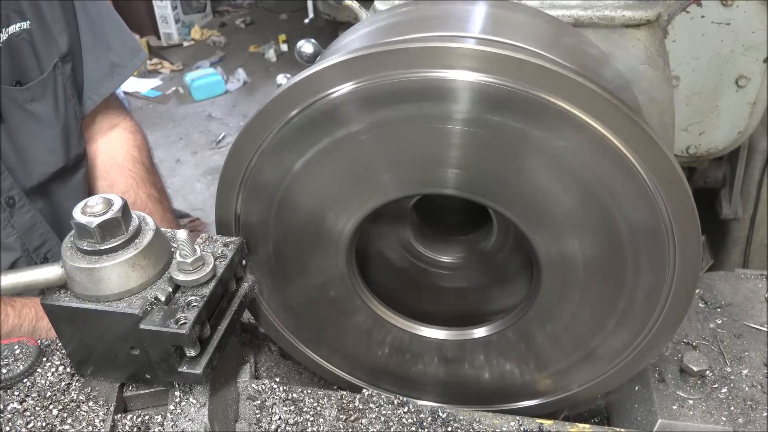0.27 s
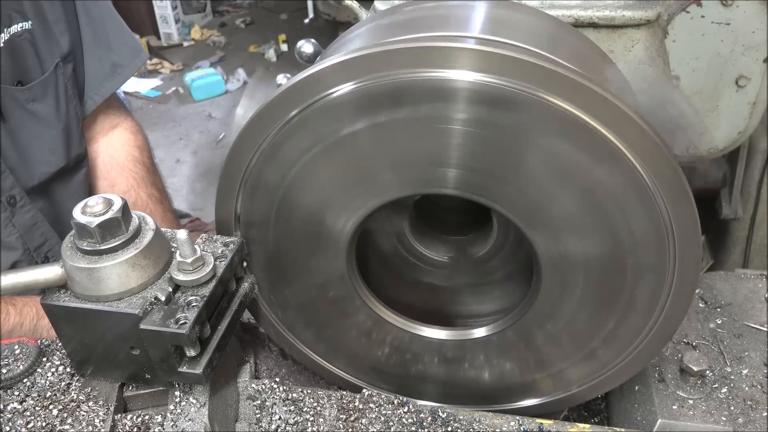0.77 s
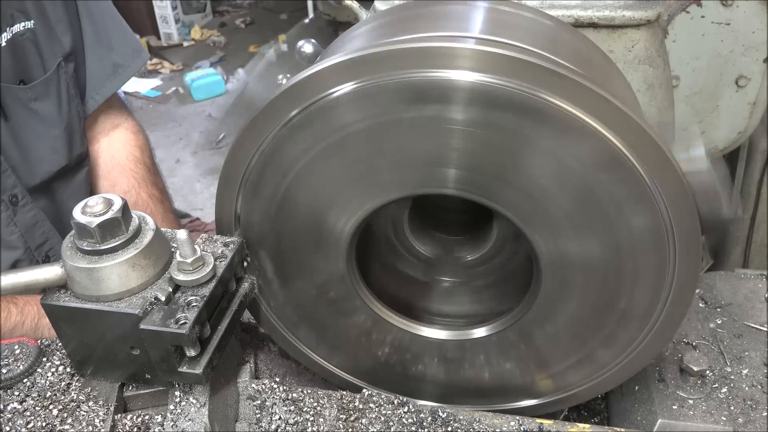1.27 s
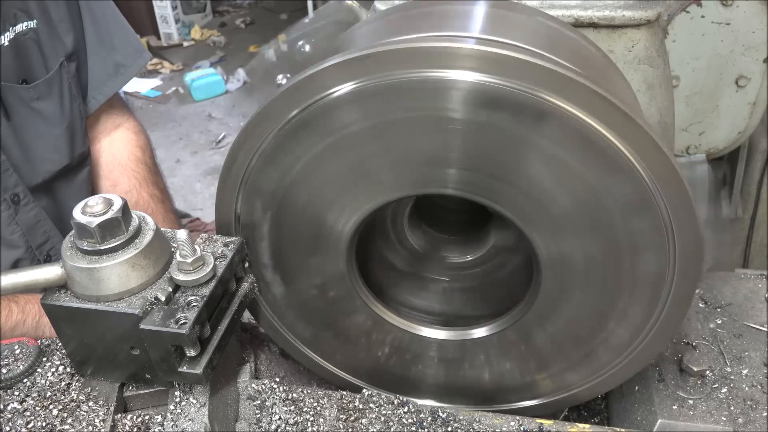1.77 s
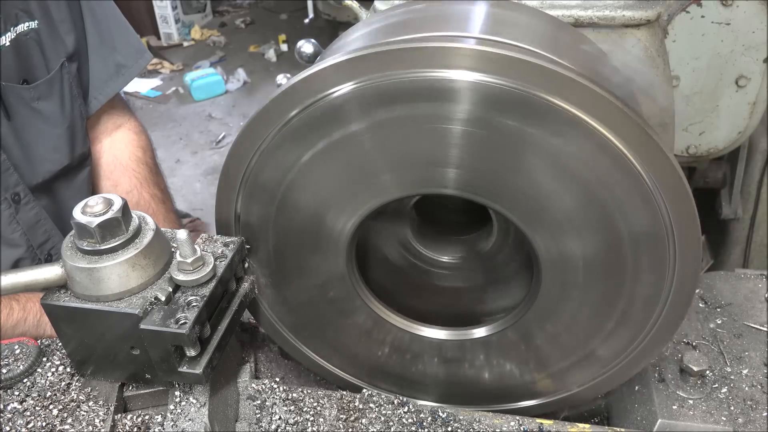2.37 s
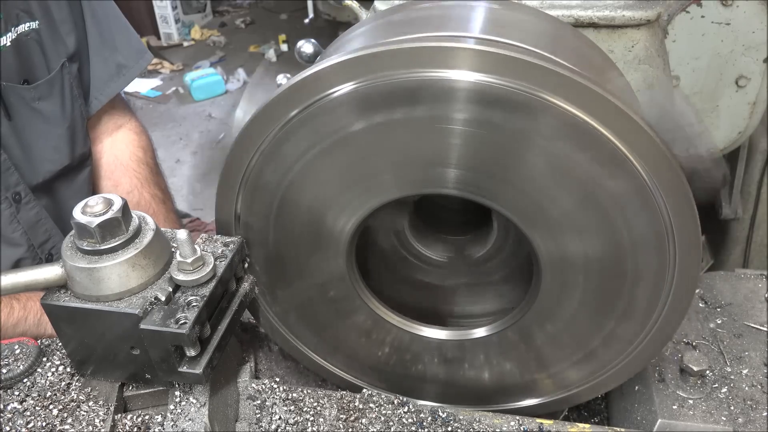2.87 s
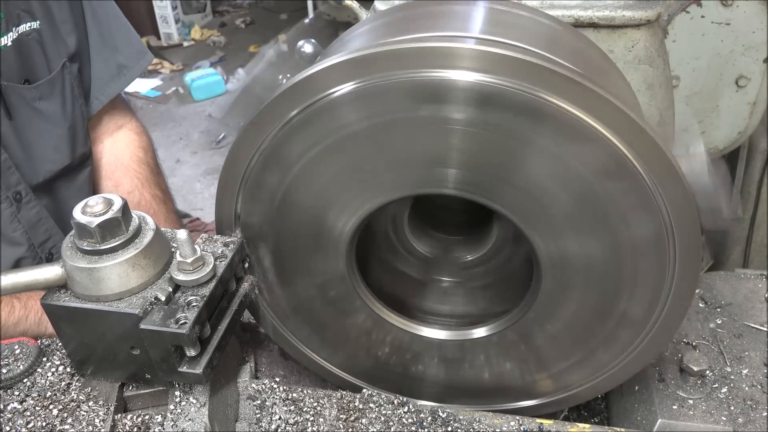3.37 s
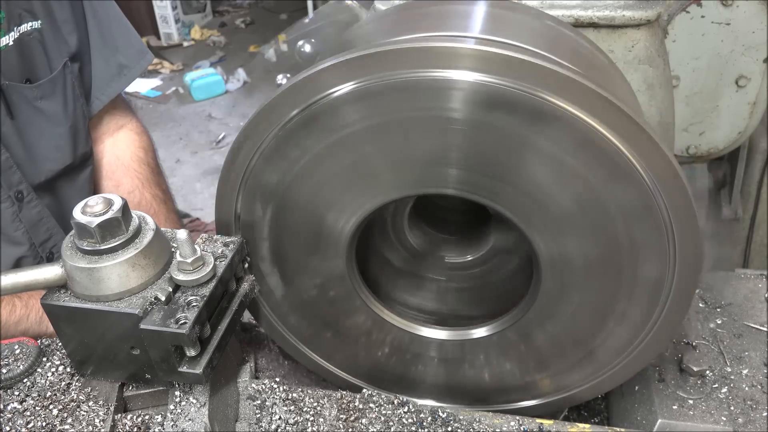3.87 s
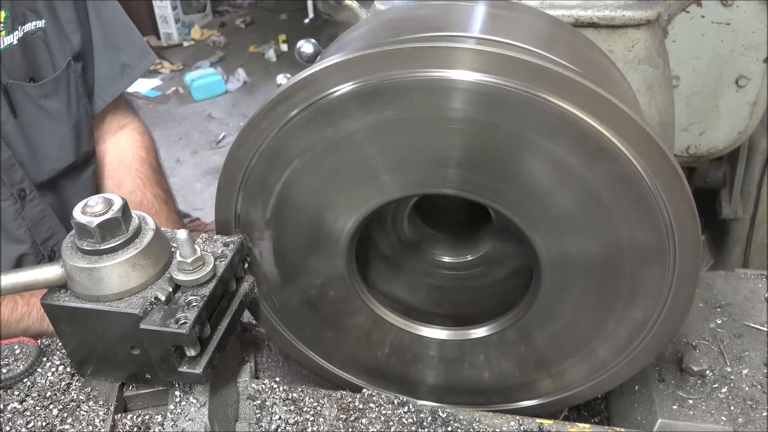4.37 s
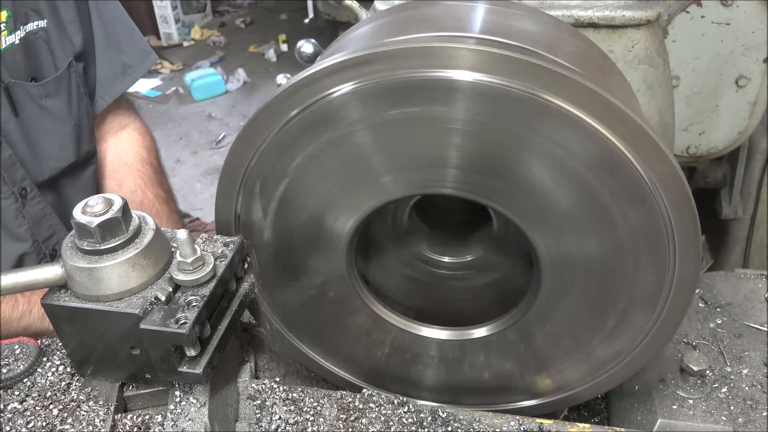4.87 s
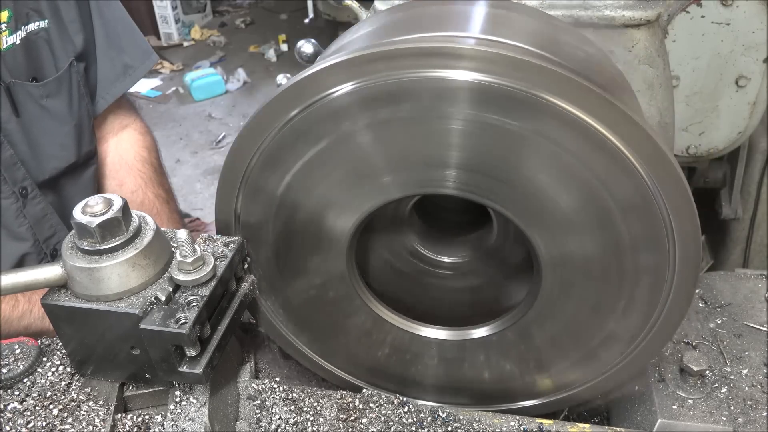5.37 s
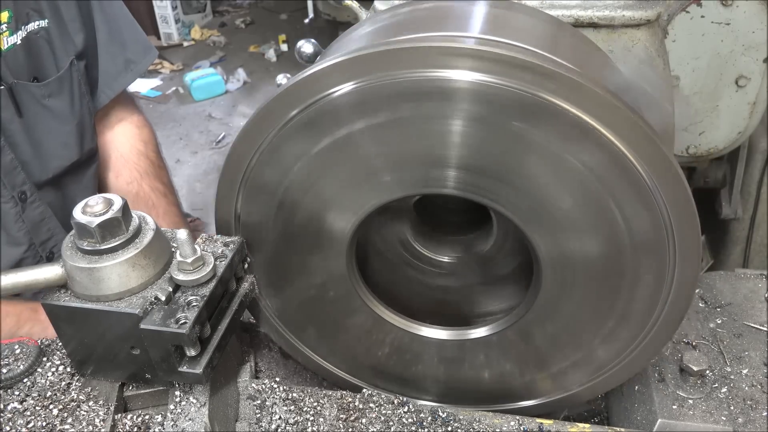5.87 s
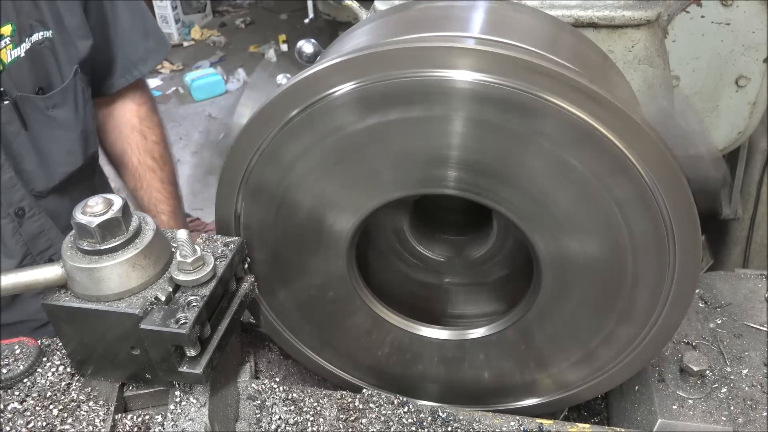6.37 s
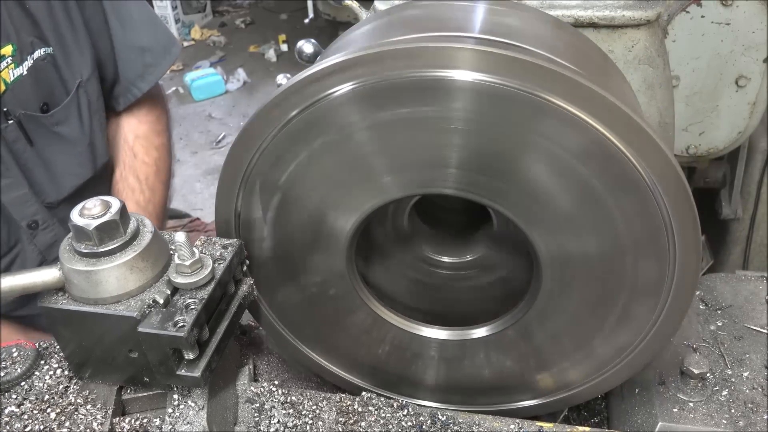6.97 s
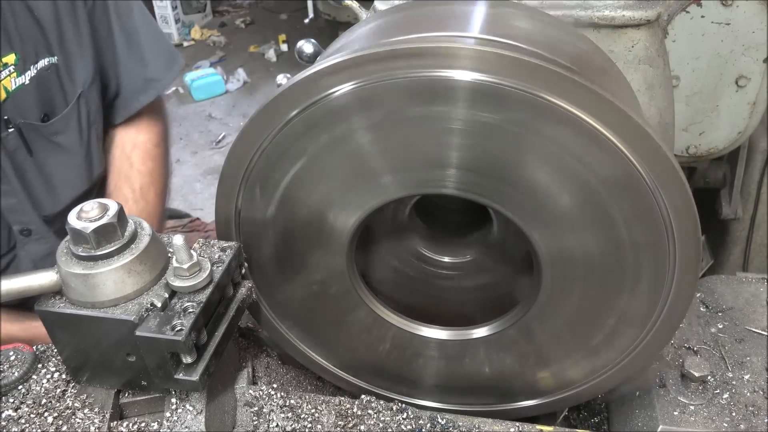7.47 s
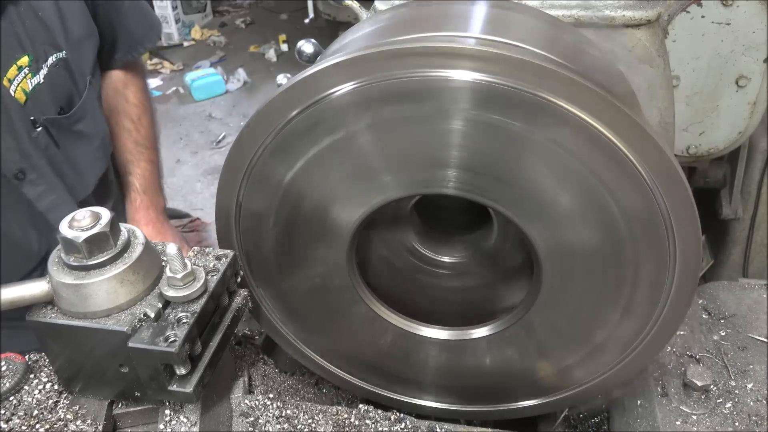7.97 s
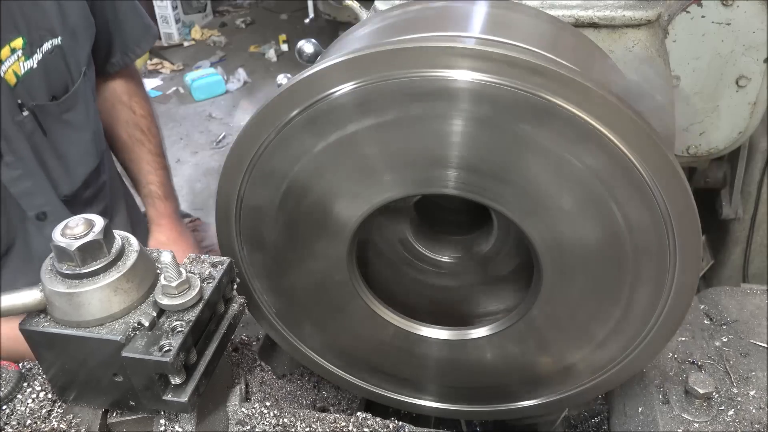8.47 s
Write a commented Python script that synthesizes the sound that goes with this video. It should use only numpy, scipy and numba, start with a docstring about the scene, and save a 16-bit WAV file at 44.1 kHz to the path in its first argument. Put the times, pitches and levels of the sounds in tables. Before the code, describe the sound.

Close up in a workshop, steel rings and screeches under a lathe cutter, swelling several times a second over the hiss of tearing chips. The tool then stutters off the metal in brief, pinging scrapes and gives one very high squeak with a sharp click. After a light tick, only the running machine remains, a steady low rumble with a hum and a gear whine.

```python
"""A bright, rough ring of steel, swelling three times a turn: a lathe tool cuts an out-of-round rim,
and the tearing chip scrapes and drives the modes of the part and the tool post. Near 6 s the tool
stutters out of the cut in short bites that leave the part pinging; its tip squeaks with a sharp click.
One light tick follows as motor and gears rumble and whine on, and the automatic gain creeps up."""
import sys
import numpy as np
from scipy import signal
from scipy.io import wavfile
from scipy.ndimage import uniform_filter1d
from numba import njit

SR = 44100
rng = np.random.default_rng(int(sys.argv[2]) if len(sys.argv) > 2 else 0)


def dump_mix(stems):
    """Bounce the given channels to the path in sys.argv[1] as a 16-bit WAV at rate SR."""
    frames = np.atleast_2d(stems).T  # one column per channel
    limited = np.clip(frames, -1, 1)  # hard clip at full scale
    pcm = np.round(limited * 32767).astype(np.int16)
    wavfile.write(sys.argv[1], SR, pcm)


N = 384552
STEP = 16  # samples between points of slow envelopes
SLOW_T = np.arange(0, N, STEP) / SR
LOBES_PER_S = 5.698  # the rim has three high places (lobes) a turn


def cut():
    """The chip sticks and slips as it tears; returns the ringing machine and the scraping chips."""
    region_db = chip_force()
    slips_db = 0.56 * wander(rate=75)
    steel = steel_ring(region_db, slips_db)
    tearing = scrape(region_db, slips_db)
    return steel + thrum(region_db), facets(tearing, depth_db=5.5)


# Loaded modes of part and tool post: (pitch [Hz], width [Hz], level [dB], then pairs of
# swell [dB] and crest [lobes] once a turn and 1, 2, 3, 4 times a lobe, then pairs of
# bend [Hz] and crest [lobes] 1, 2 times a lobe)
STEEL_MODES = [(637.5, 46, -54.5, 0.55, 1, 2.9, 0.11, 0.68, 0.1, 0.5, 0.2, 0.4, 0.1, 15.2, 0.3, 4.5, 0.17),
               (827, 67, -48, 0.5, 1, 2.2, 0.54, 1.5, 0.14, 1.1, 0.23, 0.4, 0.02, 11.5, 0.5, 10, 0.032),
               (924, 89, -49.5, 0.5, 1, 1.2, 0.49, 1.5, 0.3, 0.7, 0.035, 0.4, 0.02, 15, 0.608, 17, 0.2),
               (1068, 57, -51.5, 0.5, 0.8, 2.6, 0.63, 1, 0.069, 1, 0.056, 0.4, 0.02, 10, 0.62, 8.2, 0.22),
               (1153, 113, -44, 1.3, 1.04, 7.2, 0.17, 1.8, 0.023, 3.8, 0.23, 0.67, 0.08, 32.1, 0.15, 39.3, 0.311),
               (1376, 56, -43, 0.44, 0.27, 2.7, 0.35, 1, 0.41, 4.2, 0.11, 3.2, 0.093, 26.6, 0.529, 44.6, 0.345),
               (1519, 84, -48, 0.34, 1, 9.2, 0.1, 10.8, 0.34, 1.9, 0.1, 3.6, 0.22, 109.5, 0.149, 32.6, 0.382),
               (1893, 170, -43, 0.4, 0.02, 0.59, 1, 6.2, 0.38, 1.4, 0.081, 1.7, 0.072, 47, 0.91, 91.5, 0.044),
               (2106, 76, -43, 3.1, 0.98, 5, 0.94, 2.4, 0.13, 3.3, 0.27, 1.7, 0.17, 122, 0.168, 47, 0.187),
               (2248, 165, -41.5, 0.37, 1.1, 6.7, 0.26, 2.1, 0.42, 1.3, 0.18, 0.55, 0.062, 184.0, 0.1912, 89.5, 0.0626),
               (2405, 27, -44, 1.7, 0.94, 7.7, 0.89, 6.9, 0.097, 8.2, 0.186, 3.2, 0.24, 105.8, 0.1003, 40, 0.1985),
               (2506, 60, -49, 0.73, 2.6, 6, 0.89, 4.3, 0.25, 5.1, 0.049, 2.9, 0.12, 77, 0.121, 21, 0.385),
               (2638, 36, -49, 0.8, 1.8, 5, 0.01, 5.6, 0.29, 0.7, 0.25, 1.9, 0.082, 86.3, 0.125, 23, 0.477),
               (3000, 120, -51.5, 1.2, 1.5, 10.4, 0.093, 8.9, 0.33, 2.6, 0.11, 1.1, 0.06, 160.5, 0.217, 87, 0.29),
               (3326, 59, -42.5, 0.62, 0.12, 0.4, 0.43, 1.4, 0.4, 1.7, 0.34, 3.3, 0.12, 42, 1, 18, 0.011),
               (3440, 66, -50.5, 1.6, 1.4, 11.7, 0.04, 2.9, 0.26, 1.8, 0.26, 2.0, 0.054, 41, 0.91, 36, 0.425),
               (3695, 89, -46, 1.3, 0.5, 1.7, 0.083, 2.7, 0.27, 1.0, 0.24, 1.3, 0.15, 4.9, 0.32, 15.0, 0.34),
               (3867, 19.0, -53.5, 0.4, 1.2, 8.4, 0.85, 8.6, 0.455, 6.6, 0.08, 0.9, 0.083, 38, 0.17, 36, 0.32),
               (4116, 63, -45, 0.46, 0.43, 7, 0.62, 5.7, 0.41, 7.7, 0.31, 0.4, 0.15, 21.4, 0.11, 37, 0.073),
               (4343, 80, -43, 0.38, 3.2, 9.2, 0.097, 1.1, 0.32, 2.0, 0.034, 3.6, 0.21, 160.4, 0.18, 36.4, 0.32),
               (4420, 45, -48, 0.5, 1, 5.4, 0.14, 3, 0.22, 1, 0.014, 0.5, 0.1, 37, 0.355, 6.8, 0.28),
               (4620, 54, -46, 0.5, 1, 4, 0.35, 1, 0.2, 3, 0.22, 0.5, 0.092, 18.4, 0.3, 10, 0.19),
               (4549, 35, -36.5, 0.78, 1.8, 5.2, 0.37, 2.4, 0.48, 0.1, 0.1, 0.18, 0.2, 32.6, 0.054, 4.2, 0.24),
               (5050, 260, -53.5, 1.8, 0.18, 7.6, 0.77, 8.3, 0.29, 4.1, 0.081, 3.9, 0.13, 250, 0.63, 149, 0.39),
               (5300, 160, -46, 0.39, 1.4, 5.2, 0.97, 5.9, 0.38, 2.6, 0.3, 3.5, 0.098, 168, 0.91, 147, 0.37),
               (5600, 110, -48, 0.91, 0.35, 6.4, 0.38, 5.7, 0.098, 3.2, 0.013, 0.4, 0.54, 24.0, 0.94, 22, 0.347),
               (5720, 84, -47, 1, 0.4, 1.3, 0.47, 2.0, 0.37, 6, 0.027, 7.5, 0.21, 54, 0.06, 7.2, 0.39),
               (6040, 105, -50, 1.8, 1.7, 7.7, 0.22, 2.8, 0.2, 6.9, 0.072, 2.1, 0.01, 90, 0.92, 9.4, 0.13),
               (6750, 79, -46.5, 0.8, 1.5, 2.6, 0.26, 3.2, 0.42, 3.2, 0.24, 2.3, 0.2, 7.5, 0.33, 25.0, 0.476),
               (7080, 110, -52.5, 0.7, 0.24, 2.7, 0.24, 9.4, 0.14, 3.5, 0.031, 5.5, 0.025, 19, 0.85, 111, 0.399),
               (7456, 56, -41.5, 2.1, 1.5, 5.2, 0.52, 2.1, 0.17, 1.6, 0.13, 2.5, 0.16, 29, 0.2, 39, 0.21),
               (7650, 180, -38, 0.52, 2.1, 0.74, 0.82, 1.7, 0.33, 0.55, 0.044, 0.72, 0.14, 5.7, 0.78, 11, 0.41),
               (7960, 88, -48.5, 0.77, 2.4, 9.6, 0.025, 9.9, 0.3, 3.8, 0.24, 4.6, 0.2, 131, 0.095, 76, 0.27),
               (8210, 105, -44, 0.9, 1.2, 3.8, 0.87, 7.9, 0.11, 4.1, 0.11, 4.3, 0.18, 43, 0.832, 86, 0.076),
               (8230, 99, -45, 1.8, 1.8, 2.9, 0.71, 10.3, 0.421, 3.3, 0.097, 6.2, 0.051, 29.0, 0.18, 75, 0.409),
               (9030, 41, -53, 1.2, 0.75, 7.1, 0.51, 6.4, 0.19, 2.8, 0.33, 0.9, 0.13, 30, 0.2, 23, 0.1),
               (9800, 135, -41.5, 0.6, 0.25, 1.2, 0.7, 3, 0.093, 0.8, 0.026, 0.9, 0.22, 42.5, 0.77, 69, 0.049),
               (10390, 140, -51.5, 0.7, 1.1, 11.7, 0.14, 4.8, 0.35, 1.8, 0.14, 2.3, 0.1, 45, 0.26, 6.9, 0.59),
               (10950, 150, -49, 1.1, 2, 3.7, 0.74, 3.5, 0.12, 2.3, 0.11, 3.2, 0.046, 105, 0.75, 114, 0.124),
               (11450, 193.0, -44.5, 0.7, 1.3, 1.9, 0.26, 0.9, 0.45, 1.8, 0.37, 3.2, 0.01, 25, 0.5, 50, 0.327),
               (11830, 143.0, -45, 1.6, 0.24, 0.4, 0.81, 1.4, 0.52, 1.7, 0.29, 2.1, 0.037, 21, 0.83, 16.0, 0.27),
               (12500, 97.0, -46, 2, 1.8, 1.7, 0.19, 2.1, 0.43, 1.0, 0.15, 1.1, 0.05, 6.8, 0.31, 22.0, 0.2),
               (12735, 55, -35.5, 0.9, 0.96, 0.3, 0.71, 0.67, 0.13, 2.3, 0.3, 1.2, 0.024, 31.0, 0.71, 11.0, 0.08),
               (12960, 500, -42, 0.5, 0.1, 1.4, 0.62, 1.3, 0.26, 0.8, 0.05, 0.8, 0.18, 32, 0.81, 29.0, 0.09),
               (14370, 211.0, -47, 0.7, 0.92, 2.2, 0.79, 1.4, 0.19, 0.8, 0.03, 1.4, 0.11, 4.0, 0.78, 27.0, 0.16)]


def steel_ring(region_db, slips_db):
    """The chip drives every mode of the steel; the tool's load swells and bends each, lobe by lobe."""
    lobes = SLOW_T * LOBES_PER_S
    out = 0
    for hz, width, db, turn_db, turn_crest, *pairs in STEEL_MODES:
        fickle_db = 0.96 * wander(rate=21)  # no two passes ring alike
        detune = 0.0022 * wander(rate=15.08)
        thin_db = 0.12 * region_db[TREBLE] * width / 200  # as the chip thins, damped modes fade first
        force = gain_of(db + region_weights(hz) @ region_db + slips_db + fickle_db + thin_db)
        swell_db = per_lobe(pairs[:8], lobes) + turn_db * np.cos(2 * np.pi * (lobes - turn_crest) / 3)
        pitch = hz * (1 + detune) + per_lobe(pairs[8:], lobes)
        out += mode(pitch, width, force, gain_of(swell_db))
    return out


# How each pitch region answers the chip: (centre [Hz], full cut [dB], thinnest chip [dB],
# drift within a bite [dB/s], swell before it [dB/s], fade after it [dB/s])
REGIONS = [(1300, 1.1, 6, -8, 1600, 800), (2430, 3, 4.5, 18, 1600, 700), (4530, 3.5, -3.5, 4, 1200, 500),
           (8900, 2.5, -11.5, -35, 800, 600), (13200, 2.5, -10.5, -16, 450, 500)]
BASS, TREBLE = 0, -2  # rows of REGIONS
# Backing out, the tool meets only the high places of the rim:
# (start [s], length [s], force [dB], chip thinness [0-1], free ring [dB])
BITES = [(5.91, 0.19, 2, 0.67, -36), (6.102, 0.13, 3, 0.6, -43), (6.257, 0.11, 2, 0.6, -43),
         (6.443, 0.091, 0, 1, -50), (6.638, 0.06, -19.5, 0.3, -58), (6.774, .03, -22.5, 0, -65)]
FULL_UNTIL_S, RUB_UNTIL_S, RUB_DB, RUB_THINNESS = 5.885, 6.36, -1, 0.58


def chip_force():
    """Drive of each region in dB: the strongest of the full cut, the rub on the low side and the bites."""
    _, full_db, thin_db, drift, swell, fade = np.transpose(REGIONS)[..., None]
    levels = [full_db + contact(0, FULL_UNTIL_S, swell, fade),
              RUB_DB + RUB_THINNESS * thin_db + contact(0, RUB_UNTIL_S, swell, fade)]
    for start, length, force_db, thinness, _ in BITES:
        drift_db = drift * (np.clip(SLOW_T - start, 0, length) - length / 2)
        levels.append(force_db + thinness * thin_db + drift_db + contact(start, length, swell, fade))
    return np.maximum(np.max(levels, axis=0), -40)


# Hiss of chips tearing off: (frequency [Hz], density [dB per Hz])
SCRAPE_SPECTRUM = [(400.0, -83.5), (620.0, -78), (900.0, -77.5), (1700.0, -78.5), (2800.0, -77),
                   (3800.0, -73.5), (4800.0, -75), (6300.0, -78.5), (7100.0, -78), (8700.0, -78.5),
                   (9400.0, -82), (10600.0, -83), (12100.0, -82.5), (13600.0, -78), (14700.0, -89.8),
                   (15500.0, -120.4)]


def scrape(region_db, slips_db):
    """The tearing chip hisses; a thin one tears more quietly than the steel rings."""
    tear_db = np.minimum(region_db, 2.5) + 0.47 * region_db[TREBLE] + slips_db
    def colour(hz, s):
        drive_db = region_weights(hz[:, 0] + 1).T @ [np.interp(s, SLOW_T, row) for row in tear_db]
        return gain_of(curve(SCRAPE_SPECTRUM, hz) + drive_db)
    return shaped(np.sqrt(SR / 2) * rng.standard_normal(N), colour)


def facets(x, depth_db):
    """Countless small modes colour the scrape: narrow patches that return with every lobe; no bass."""
    cos_mix, sin_mix = rng.standard_normal((2, 5, 513))  # lobe harmonics by frequency bins
    def colour(hz, s):
        angle = 2 * np.pi * LOBES_PER_S * np.arange(5)[:, None] * s
        patches = evened(cos_mix.T @ np.cos(angle) + sin_mix.T @ np.sin(angle))
        return gain_of(depth_db * patches) / (1 + (430 / (hz + 1)) ** 4)
    return shaped(x, colour)


# Low shudder of the machine bed: (frequency [Hz], density [dB per Hz])
THRUM_SPECTRUM = [(20, -84), (50, -79.5), (90, -87.5), (160, -62.5), (250, -78), (500, -80), (800, -100)]


def thrum(region_db):
    """The cut shakes the bed; the deepest notes follow its force least."""
    def colour(hz, s):
        drive_db = np.minimum(hz / 350, 1.4) * np.interp(s, SLOW_T, region_db[BASS])
        return gain_of(curve(THRUM_SPECTRUM, hz) + drive_db)
    return shaped(np.sqrt(SR / 2) * rng.standard_normal(N), colour)


# Modes of the part free of the tool: (pitch [Hz], width [Hz], level [dB], delay [s])
FREE_MODES = [(822, 21, -3.5, .01), (1330, 18, -7.5, -0.013), (2030, 28, -2, -0.012), (2265, 14, -6, 0.013),
              (3280, 28, -13, 0.046), (4020, 12, -9, -0.017), (4590, 15, -10, 0.027)]


def free_ring():
    """Each bite sets the part ringing at its unloaded notes, some speaking later than others."""
    bites_db = [db + contact(start, length, swell=400, fade=191.5) for start, length, *_, db in BITES]
    touch_db = np.max(bites_db, axis=0)
    return sum(mode(hz, width, gain_of(db + np.interp(SLOW_T - delay, SLOW_T, touch_db)), gain=0.71)
               for hz, width, db, delay in FREE_MODES)


# Short, overlapping notes of the part: (start [s], length [s], pitch [Hz], level [dB])
PING_NOTES = [(5.875, 0.027, 11400, -35), (5.94, .04, 2050, -31), (5.95, .09, 4520, -28),
              (5.952, .03, 11150, -36), (5.995, .04, 2400, -29), (6.0, .05, 1200, -31),
              (6.11, .13, 4550, -26), (6.15, .05, 1193, -28), (6.2, .035, 1476, -28),
              (6.237, 0.038, 11150, -37), (6.295, 0.069, 4550, -26), (6.31, .045, 2520, -27),
              (6.345, 0.036, 1597, -27), (6.437, .03, 2400, -29), (6.438, .03, 1013, -33),
              (6.462, .035, 2050, -29.5), (6.48, 0.095, 4496, -31), (6.49, 0.055, 1200, -32.5),
              (6.5, .05, 2380, -26.5), (6.505, .045, 1600, -32), (6.355, 0.042, 4075, -40),
              (6.371, 0.039, 1344, -32), (6.374, 0.055, 2300, -32), (6.545, 0.037, 1350, -35),
              (6.547, 0.043, 2310, -35), (6.565, .05, 823, -40), (6.578, 0.034, 2035, -40),
              (6.625, .075, 822, -35.5), (6.635, .05, 2030, -41), (6.647, .06, 4065, -43.5),
              (6.666, .07, 2285, -41), (6.682, .045, 4500, -45), (6.705, .06, 3330, -46),
              (6.73, .065, 4500, -49)]


def pings():
    """Short squeals and pings during and after the bites, each swelling and fading unsteadily."""
    out = np.zeros(N)
    for start, length, hz, db in PING_NOTES:
        t = np.arange(0, length, 1 / SR)
        shake = 1 + 0.44 * evened(uniform_filter1d(rng.standard_normal(len(t)), size=300))
        swell = np.sin(np.pi * (t / length) ** 0.83)
        out[round(start * SR):][:len(t)] += gain_of(db) * swell * shake * np.sin(2 * np.pi * hz * t)
    return out


# Last grazes of the tool tip: (start [s], length [s], level [dB])
GRAZES = [(6.706, 0.011, -48), (6.725, 0.046, -27.5), (6.763, .038, -36), (6.802, .016, -44)]
SQUEAK_HZ, SAG_HZ_PER_S, FLUTTER_HZ, RIGHT_LAG_S = 13100, 5400, 110, 0.004


def squeak():
    """The tip rubs out fluttering tones that swell, sag and stop, a little later on the right."""
    out = np.zeros((2, N))
    for start, length, db in GRAZES:
        t = np.arange(0, length, 1 / SR)
        swell = np.sin(np.pi * (t / length) ** 0.76) ** 2
        tone = np.sin(2 * np.pi * (SQUEAK_HZ * t - SAG_HZ_PER_S * t ** 2 / 2))
        for side, lag in enumerate((0, RIGHT_LAG_S)):
            flutter = 1 + 0.44 * np.cos(2 * np.pi * (FLUTTER_HZ * t + rng.random()))
            out[side, round((start + lag) * SR):][:len(t)] += gain_of(db) * swell * flutter * tone
    return out


# A sharp click within the tool tip's squeak, then one light tick: (time [s], level [dB], pitch [Hz])
CLICKS = [(6.743, -49, 13000), (7.201, -40, 4500)]


def clicks():
    """Each is a wide, noisy ring that dies within milliseconds."""
    out, t = np.zeros(N), np.arange(1000) / SR
    for start, db, hz in CLICKS:
        burst = evened(ring(rng.standard_normal(len(t)), hz, width=2500))
        out[round(start * SR):][:len(t)] = gain_of(db) * np.exp(-t / 0.0057) * burst
    return out


# Noise of motor, gears and workshop: (frequency [Hz], relative level [dB])
RUMBLE_SPECTRUM = [(30, -36), (85, -32), (150, -8.5), (220, -5.5), (350, -6.5), (600, -11), (900, -10),
                   (1470, -14.5), (2300, -18), (2830, -21), (4310, -23), (8000, -20), (13300, -18.5),
                   (15500, -41)]
# Its stereo focus: (frequency [Hz], left-right likeness [0-1])
RUMBLE_LIKENESS = [(60, .86), (130, .96), (300, .96), (550, .96), (1000, .97), (2300, 1), (5200, 1),
                   (6800, .5), (10000, .05), (13000, .55)]
# Its stereo position: (frequency [Hz], left minus right [dB])
RUMBLE_BALANCE = [(60, 0), (120, 5), (220, -3), (360, -5.5), (550, -4.5), (800, -3), (1200, -1.5),
                  (2500, 0), (5000, 0), (6500, -2.5), (9500, -6), (13000, -1.5)]
# Resonances of the casing: (pitch [Hz], width [Hz], level [dB])
CASING_MODES = [(253, 145, -55), (440, 42, -68.5), (904, 67, -60.5), (1160, 17, -69), (1920, 69, -68),
                (3570, 20, -65), (3820, 10, -66), (4070, 60, -71), (5420, 120, -65.5), (6000, 70, -67),
                (6130, 50, -70), (6740, 90, -64.5), (6930, 90, -65.5)]


def rumble():
    """Lumpy noise of the drive ringing in its casing, nearly alike on both sides in the bass."""
    left, other = rng.standard_normal((2, N))
    likeness = lambda hz, _: np.clip(curve(RUMBLE_LIKENESS, hz), 0, 1)
    right = shaped(left, likeness) + shaped(other, lambda hz, s: np.sqrt(1 - likeness(hz, s) ** 2))
    noise = np.array([left, right])
    body = gain_of(-43) * evened(shaped(noise, lambda hz, _: gain_of(curve(RUMBLE_SPECTRUM, hz))))
    for hz, width, db in CASING_MODES:
        lumps = np.repeat(gain_of(db + 3.6 * wander(rate=6.8)), STEP)[:N]
        body += lumps * evened(ring(noise, hz, width))
    sides = np.array([.5, -.5])[:, None, None]
    return shaped(body, lambda hz, _: gain_of(sides * curve(RUMBLE_BALANCE, hz)))


# Shaft orders, mains hum and gear teeth: (pitch [Hz], level [dB], left minus right [dB])
WHINE_TONES = [(120.0, -47.1, 6.5), (240.0, -58.0, -4.0), (270.0, -54.5, -4.0), (330.0, -59.5, -5.0),
               (359.9, -50.5, -5.4), (1319.9, -53.6, 0.0), (1439.9, -54.4, -4.0), (1937.5, -59.7, 0.0),
               (2039.1, -66.4, 0.0), (2120.1, -62.4, 0.0), (3590.3, -60.5, 0.0), (3607.1, -58.5, 0.0),
               (3782.6, -57.5, 0.0), (4050.5, -69.5, 0.0), (4523.0, -71.3, 0.0), (4965.1, -62.5, 0.0),
               (5377.4, -68.5, 0.0), (5970.8, -67, 1.5), (6149.9, -67, -2.8), (6284.8, -72.2, -1.8),
               (6501.4, -69.5, -4.1), (6593.0, -67.5, -2.8), (6741.2, -66, -2.3), (6892.2, -65.5, -3.5),
               (7447.6, -71.2, -3.8), (7743.2, -71.1, -5.7), (7775.7, -68.2, -10.3)]
# Buzz at multiples of the shaft's speed: (frequency [Hz], relative level [dB])
SHAFT_SPECTRUM = [(150, -22), (300, 1), (500, -20), (1600, -23), (2200, -8.5), (2700, -21), (3400, -18),
                  (3900, -30), (4400, -34), (8000, -38)]
SHAFT_HZ = 30


def whines():
    """Motor and gears sing steady tones, the higher ones wavering, over the shaft's faint buzz."""
    out = np.zeros((2, N))
    for hz, db, pan_db in WHINE_TONES:
        waver = min((hz - 100) / 1200, 1)
        level = gain_of(db + 1.5 * waver * wander(rate=25))
        phase = 2 * np.pi * rng.random() + .5 * waver * wander(rate=1.4)
        tone = np.sqrt(2) * lift(level * np.exp(1j * phase), np.full(len(level), float(hz)))
        out += [tone * gain_of(pan_db / 2), tone / gain_of(pan_db / 2)]
    one_turn = rng.standard_normal(SR // SHAFT_HZ)
    buzz = shaped(np.resize(one_turn, N), lambda hz, _: gain_of(curve(SHAFT_SPECTRUM, hz)))
    return out + gain_of(-54) * evened(buzz)


def workshop(x, tail_db=-15.5, t60_s=0.84):
    """The workshop answers with a short dull tail."""
    t = np.arange(SR // 2) / SR
    dull_noise = signal.lfilter([1], [1, -.4], rng.standard_normal(len(t)))
    tail = dull_noise * gain_of(-60 * t / t60_s) * np.minimum(t / 0.017, 1)
    return x + gain_of(tail_db) * signal.oaconvolve(x, tail / np.linalg.norm(tail))[:N]


# Stereo width of the cut: (frequency [Hz], side level [dB])
CUT_WIDTH = [(60, -12), (400, -18), (700, -79), (5000, -89), (5500, -29), (6000, -14), (7000, -17),
             (8100, -6), (9300, -11), (9900, -11), (11200, -0.5), (12700, -15), (13600, -8), (15000, -16)]
# Position of the cut: (frequency [Hz], leftward lean [share])
CUT_LEAN = [(5500, 0), (7800, 0.067), (9000, 0.26), (10500, -0.31), (14000, -0.011)]


def stereo_spread(x, chips):
    """The cut spreads wide in the treble, its image shifting with each turn."""
    smear = rng.standard_normal(6000) * np.exp(-np.arange(6000) / 1200)
    scattered = x + gain_of(4) * chips  # flying chips scatter more than the ring of the steel
    diffuse = signal.oaconvolve(scattered, smear / np.linalg.norm(smear))[:N]
    turning = lambda s: np.exp(2j * np.pi * LOBES_PER_S / 3 * s)
    side = shaped(diffuse, lambda hz, s: gain_of(curve(CUT_WIDTH, hz)) * turning(s))
    side += shaped(x, lambda hz, _: curve(CUT_LEAN, hz))
    return np.array([x + side, x - side])


def mode(hz, width, force, gain):
    """A noisy force rings one mode: smoothed twice for steep skirts, then lifted onto the pitch."""
    r = np.exp(-np.pi * 1.4 * width * STEP / SR)
    push = force * (rng.standard_normal(len(force)) + 1j * rng.standard_normal(len(force)))
    envelope = signal.lfilter([np.sqrt((1 - r * r) ** 3 / (1 + r * r))], [1, -2 * r, r * r], push)
    return lift(gain * envelope, hz * np.ones(len(force)))


@njit
def lift(slow, hz):
    """Lifts a slow complex envelope onto a moving pitch."""
    out, carrier = np.zeros(len(slow) * STEP), 1 + 0j
    for k in range(len(slow) - 1):
        spin = np.exp(2j * np.pi * hz[k] / SR)
        for j in range(STEP):
            carrier *= spin
            envelope = slow[k] + (slow[k + 1] - slow[k]) * j / STEP
            out[k * STEP + j] = (envelope * carrier).real
    return out[:N]


def contact(start, length, swell, fade):
    """Attack, hold and release in dB; swell and fade in dB per second."""
    return -swell * np.maximum(start - SLOW_T, 0) - fade * np.maximum(SLOW_T - start - length, 0)


def per_lobe(pairs, lobes):
    """A pattern that repeats each lobe, from (height, crest) pairs of its harmonics."""
    return sum(height * np.cos(2 * np.pi * k * (lobes - crest))
               for k, (height, crest) in enumerate(np.reshape(pairs, (-1, 2)), start=1))


def region_weights(hz):
    """Crossfade between the pitch regions nearest to hz."""
    log_centres = np.log(np.transpose(REGIONS)[0])
    return np.array([np.interp(np.log(hz), log_centres, row) for row in np.eye(len(REGIONS))])


def wander(rate):
    """Slow random drift of rms 1; a higher rate is more restless."""
    knots = rng.standard_normal(int(N / SR * 60) + 2)  # 60 a second
    smooth = signal.lfilter([1], [1, -np.exp(-2 * np.pi * rate / 60)], knots)
    return evened(np.interp(SLOW_T * 60, np.arange(len(knots)), smooth))


def shaped(x, colour):
    """A moving filter: multiplies the short-time spectrum by colour(hz, seconds)."""
    hz, s, spectrum = signal.stft(x, SR, nperseg=1024, noverlap=512)
    return signal.istft(spectrum * colour(hz[:, None], s), SR, nperseg=1024, noverlap=512)[1][..., :N]


def ring(x, hz, width):
    """One two-pole resonance."""
    return signal.lfilter(*signal.iirpeak(hz, hz / width, SR), x)


def curve(points, hz):
    """Reads a table along a log-frequency axis."""
    point_hz, value = np.transpose(points)
    return np.interp(np.log(hz + 1), np.log(point_hz + 1), value)


def gain_of(db):
    """Decibels to gain."""
    return 10 ** (np.asarray(db) / 20)


def evened(x):
    """Scales to rms 1."""
    return x / np.sqrt(np.mean(x ** 2) + 1e-20)


def scene():
    """The cut, its ring and its squeak over the running drive."""
    steel, chips = cut()
    cutting = workshop(steel + chips + free_ring() + pings())
    return stereo_spread(cutting, chips) + squeak() + clicks() + rumble() + whines()


def record(dry):
    """Automatic gain holds the cut down and slowly recovers; then soft clipping, low cut and high cut."""
    power_db = 10 * np.log10(abs(uniform_filter1d((dry ** 2).mean(0), size=8000)) + 1e-12)
    release_db = 4.05 * np.arange(N) / SR
    held_db = np.maximum.accumulate(power_db + release_db) - release_db
    levelled = dry / gain_of(0.89 * (uniform_filter1d(held_db, size=2000) + 23))
    clipped = 0.53 * np.tanh(levelled / 0.54)
    low_cut = signal.lfilter(*signal.butter(2, 60, "high", fs=SR), clipped)
    high_cut_taps = signal.firwin(511, 15700, window=("kaiser", 9), fs=SR)
    return signal.oaconvolve(low_cut, high_cut_taps[None], "same")


dry = scene()
out = record(dry)
dump_mix(out)
```